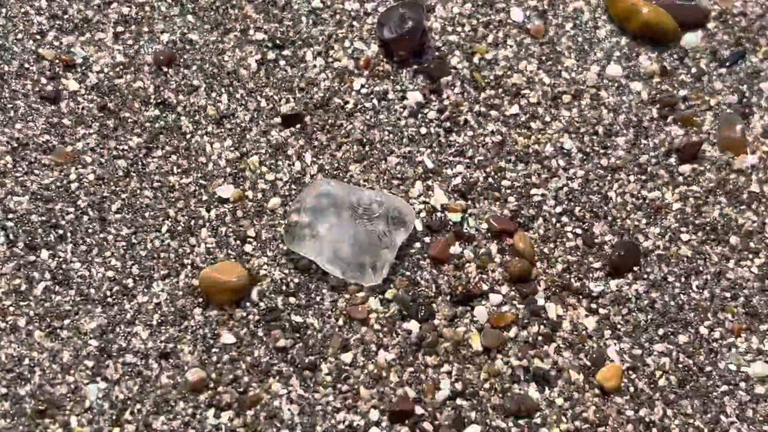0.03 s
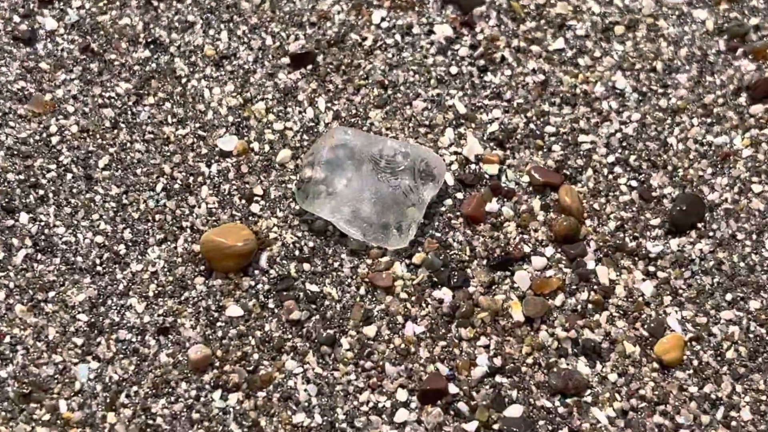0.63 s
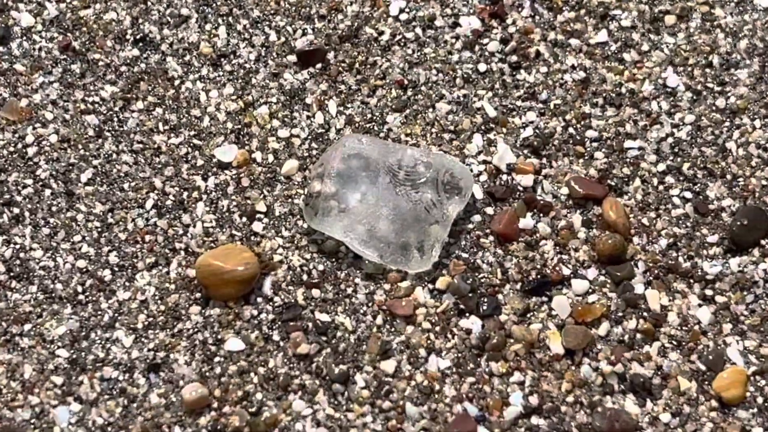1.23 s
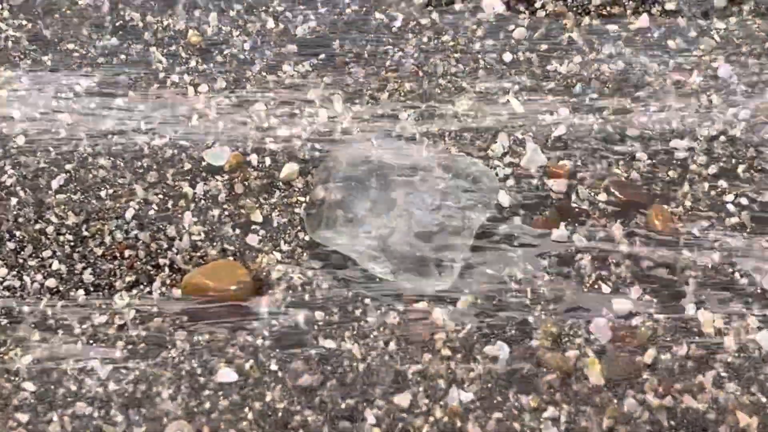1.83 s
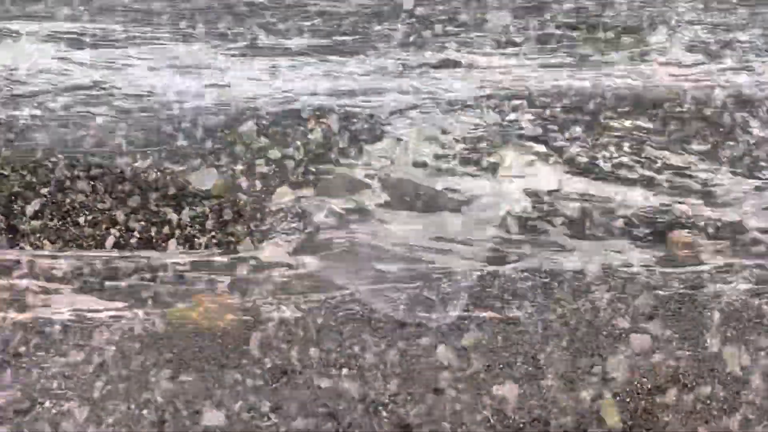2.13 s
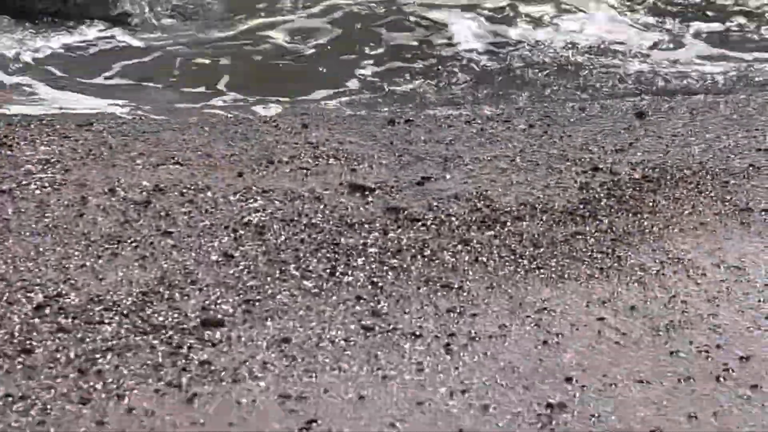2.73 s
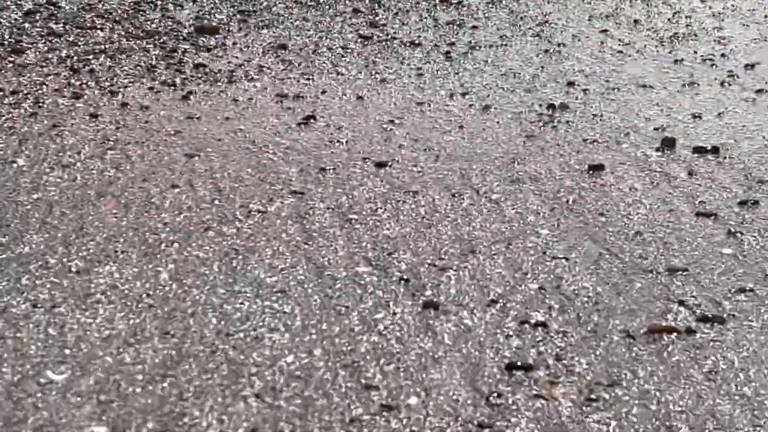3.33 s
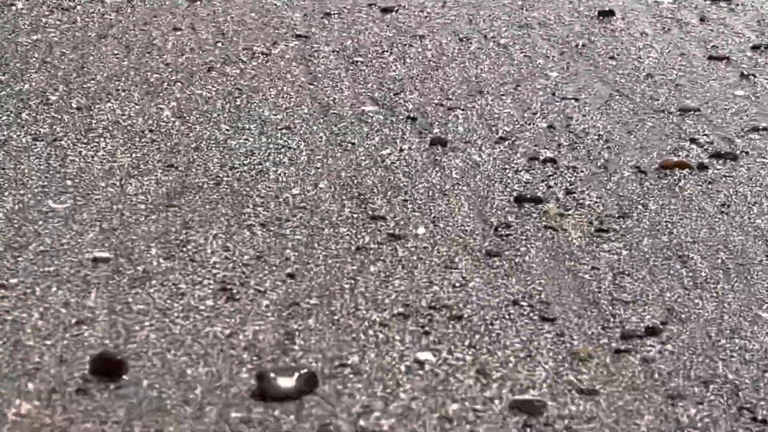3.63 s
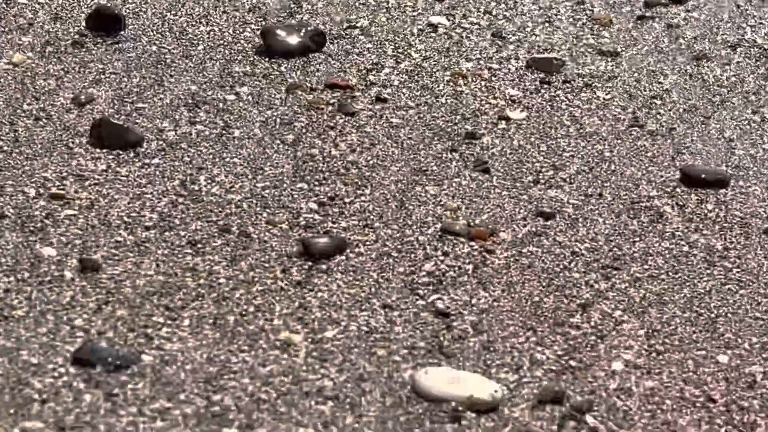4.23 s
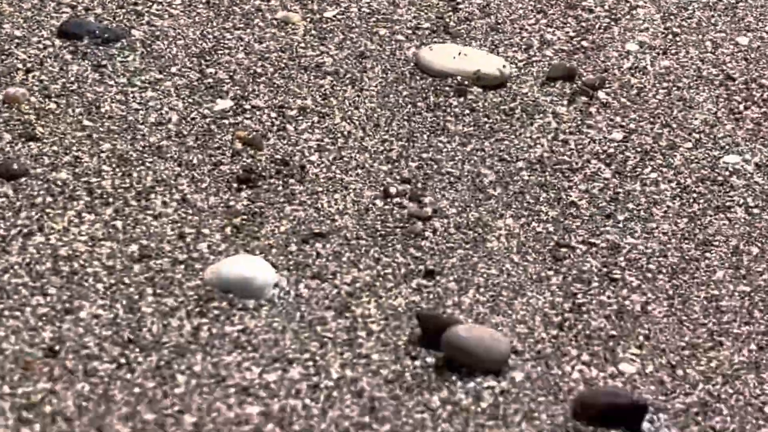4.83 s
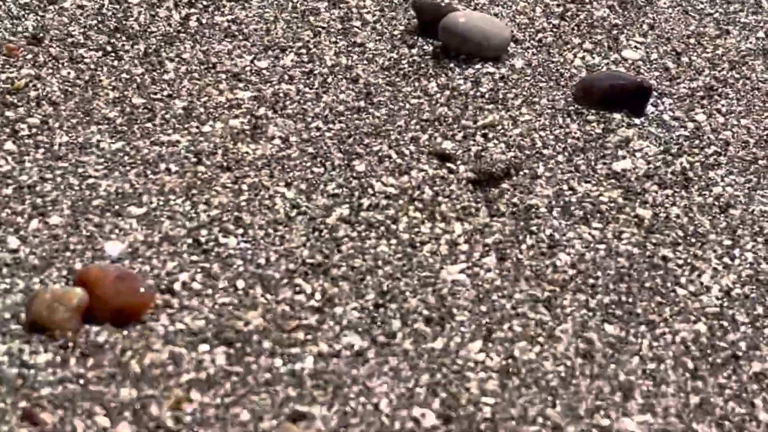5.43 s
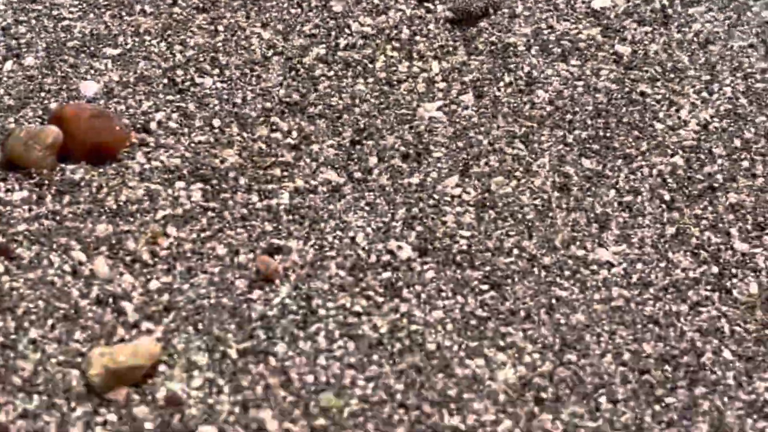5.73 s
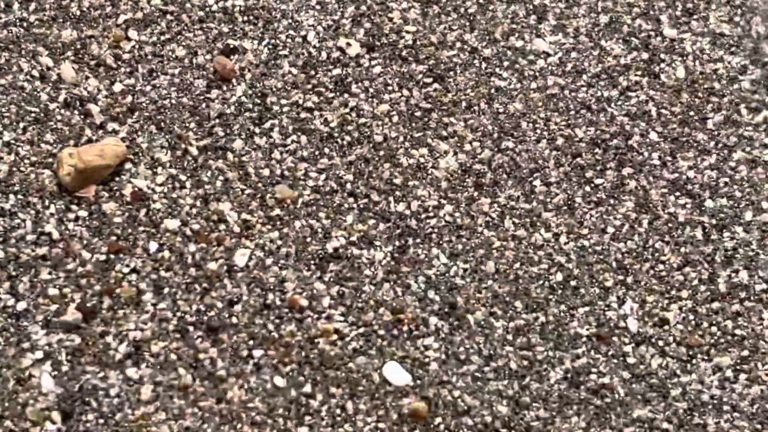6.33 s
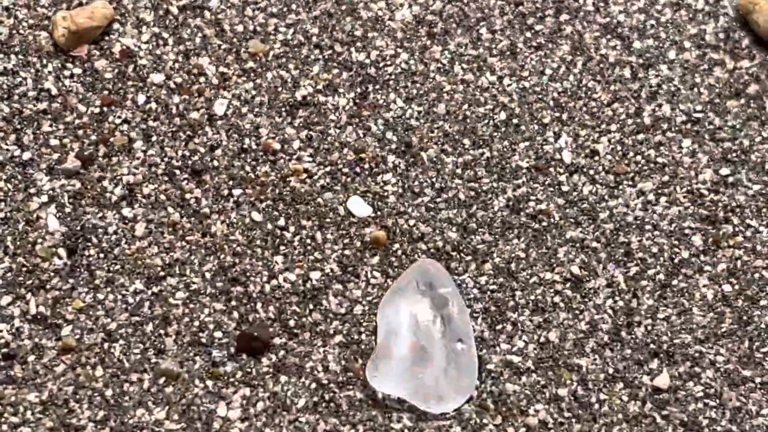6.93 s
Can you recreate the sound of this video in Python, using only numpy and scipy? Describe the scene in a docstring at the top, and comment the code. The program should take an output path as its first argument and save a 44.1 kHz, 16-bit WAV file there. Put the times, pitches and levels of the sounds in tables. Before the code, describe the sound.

Gentle surf washes up a gritty shore three times over a dull sea roar, while soft wind buffets bump the microphone.

```python
"""A beach of fine shingle, heard from just above the water line.
Bubble clouds roar dully in the surf further out. Three small waves spill and wash up, with weaker
ones between; their bubbles ring, their foam fizzes and they rattle the grit, each with a ground echo.
Light wind rumbles on the microphone, with a cluster of soft buffets before the middle wave."""
import sys
import numpy as np
from scipy import signal
from scipy.fft import rfft, irfft, next_fast_len
from scipy.io import wavfile
from scipy.ndimage import uniform_filter1d, map_coordinates

SR = 44100
rng = np.random.default_rng(int(sys.argv[2]) if len(sys.argv) > 2 else 0)


def master_out(mix):
    """Clip the mix to full scale and print it as 16-bit PCM to the path in sys.argv[1]."""
    frames = np.transpose(np.atleast_2d(mix))
    ceiling = np.clip(frames, -1, 1)
    pcm = np.round(ceiling * 32767).astype(np.int16)
    wavfile.write(sys.argv[1], SR, pcm)


N = 317520

# Breaking waves: (break time [s], build-up [s], spill length [s],
# roar level [dB], wash level [dB], foam level [dB], foam build-up [s])
WAVES = [(-0.13, .31, 0.17, -31.5, -31.5, -44.5, .31), (2.454, 0.91, 0.25, -36.5, -39, -43.5, 0.89),
         (3.24, 0.31, 0.54, -31.5, -29, -37, 0.083), (4.383, 0.46, 0.31, -35.5, -36, -66, .8),
         (5.332, 0.49, 0.18, -35, -63, -82, .43), (6.598, 0.72, 0.55, -29.5, -29.5, -42, 0.61)]


def amp(db):
    """Amplitude ratio: tenfold for every 20 dB."""
    return 10 ** (np.asarray(db) / 20)


def unit(x):
    """Normalisation to an rms of 1."""
    return x / np.sqrt(np.mean(x ** 2) + 1e-20)


def along(points, hz, column=1):
    """Interpolation of one table column on a logarithmic frequency axis."""
    columns = np.transpose(points)
    return np.interp(np.log(hz + 1), np.log(columns[0] + 1), columns[column])


def wobble(rate_hz):
    """Slow random modulation: a spline through rate_hz Gaussian knots a second."""
    knots = rng.standard_normal(1024)
    return map_coordinates(knots, [np.arange(N) * rate_hz / SR], mode="wrap")


def filtered(x, response):
    """Linear filtering: the spectrum of x times a complex frequency response."""
    padded = next_fast_len(N + 8192)
    return irfft(rfft(x, padded) * response(np.fft.rfftfreq(padded, 1 / SR)), padded)[..., :N]


def surges(rows, lag_s, ebb_s, calm_db):
    """Incoherent addition: surges build, hold and ebb, and their powers add over a calm floor."""
    t = np.arange(N) / SR - lag_s
    power = amp(calm_db) ** 2
    for start, build, length, db in rows:
        shape = np.exp(np.minimum(t - start, 0) / build - np.maximum(t - start - length, 0) / ebb_s)
        power = power + (amp(db) * shape) ** 2
    return np.sqrt(power)


def churn(patchy_db):
    """Modulated noise: two white streams whose strength varies in patches of time and frequency."""
    spectra = signal.stft(rng.standard_normal((2, N)), nperseg=512)[2]
    patches = uniform_filter1d(rng.standard_normal(spectra.shape[1:]), size=5, axis=0)
    patches = uniform_filter1d(patches, size=12, axis=1)
    return unit(signal.istft(spectra * amp(patchy_db * unit(patches)), nperseg=512)[1][:, :N])


def grains(low_hz, high_hz, cycles, spread_db, rise, count, samples):
    """Damped oscillators in two streams: bubbles that glide upward, or stones that tick."""
    when, pitch, bulk, life, side = rng.random((count, 5)).T[:, :, None]
    hz = low_hz * (high_hz / low_hz) ** pitch
    t = np.arange(samples) / SR
    age = t * hz / (cycles * (.5 + life))  # in decay times
    strength = amp(spread_db * np.minimum(-np.log(1 - bulk), 5)) * hz / high_hz
    envelope = strength * np.exp(-age) * (1 - t / t.max())
    ring = envelope * np.sin(2 * np.pi * hz * t * (1 + rise * np.minimum(age, 2)))
    where = (when * N).astype(int) + np.arange(samples)
    pan = (np.cos(2 * np.pi * side), np.sin(2 * np.pi * side))
    return unit(np.array([np.bincount(where.ravel(), (ring * p).ravel(), N)[:N] for p in pan]))


def over_ground(pair):
    """Comb filtering: an inverted echo off the porous shingle, its delay set by microphone height."""
    # Ground reflection, strong while the microphone is low: (time [s], delay [ms], strength [0-1])
    reflection = [(0, 1.19, .22), (1.2, 1.22, .17), (2.0, 1.9, .04), (5.3, 1.03, .06), (5.6, 1.04, .18),
                  (6.0, 1.07, .2), (6.4, 1.15, .34), (7.2, 1.33, .1)]
    times, delays, strengths = np.transpose(reflection)
    t = np.arange(N) / SR
    delay_ms, strength = np.interp(t, times, delays), np.interp(t, times, strengths)
    delayed = np.arange(N) - delay_ms * SR / 1000
    glancing = filtered(pair, lambda hz: 1 / (1 + (hz / 7500) ** 4))  # the rough bed scatters treble
    echo = np.array([map_coordinates(stream, [delayed]) for stream in glancing])
    return (pair - strength * echo) / np.hypot(1, strength)


def in_stereo(pair, colour):
    """Partial coherence: two independent streams are coloured and mixed to left and right, at rms 1."""
    # Stereo image across frequency: (frequency [Hz], coherence [0-1], left lead [rad], left over right [dB])
    stereo_image = [(60, .97, 0, 0), (140, .72, .1, 0), (320, .84, .1, .2), (500, .75, 0, .6),
                    (800, .5, 0, 1.8), (1130, .38, -.4, 1.5), (1350, .56, -2.4, -3.1),
                    (1590, .58, -2.5, -4.3), (1640, .7, -3.2, -4.5), (1672, .75, -5.0, -5),
                    (1750, .82, -5.9, -4.6), (2200, .95, -6.2, -1.6), (3200, .975, -6.25, -.3),
                    (3700, .997, -6.28, 0), (5100, .997, -6.3, 0), (5500, .8, -7.1, 0),
                    (7400, .75, -8.15, 0), (8300, .95, -9.4, 0), (9200, .6, -10.4, 0),
                    (10300, .63, -11.1, 0), (11300, .9, -12.2, 0), (12000, .99, -12.55, 0),
                    (12800, .9, -12.9, 0), (13500, .6, -13.9, 0), (14500, .55, -14.4, 0)]

    def blend(hz):
        turn = np.arccos(np.clip(along(stereo_image, hz), 0, 1)) / 2
        return amp(along(colour, hz)) * [np.cos(turn), np.sin(turn)]

    def lean(hz):
        lead, balance_db = along(stereo_image, hz, column=2), along(stereo_image, hz, column=3)
        half = np.exp(.5j * lead) * amp(balance_db / 2)
        sides = np.array([half, 1 / half])
        return sides / np.linalg.norm(sides, axis=0)
    common, apart = filtered(pair, blend)
    return unit(filtered(np.array([common + apart, common - apart]), lean))


def swells(rows):
    """Band-limited noise: each row swells and fades in a Gaussian envelope, with its ground echo."""
    t = np.arange(N) / SR
    total = np.zeros((2, N))
    for peak_s, db, half_s, centre_hz, octaves in rows:
        passband = lambda hz: np.exp(-(np.log2((hz + 1) / centre_hz) / octaves) ** 2 / 2)
        band = filtered(rng.standard_normal((2, N)), passband)
        total += amp(db) * np.exp(-((t - peak_s) / half_s) ** 2) * unit(band)
    return np.std(total) * in_stereo(over_ground(total), colour=[(1, 0), (SR, 0)])


def wind():
    """Turbulent pressure: eddies rumble on the microphone in quick lumps, harder in each gust."""
    # Gusts: (time [s], build-up [s], length [s], level [dB])
    gusts = [(0.03, 0.079, 0.053, -42.5), (2.0, 0.2, 1, -35), (3.42, 0.21, 0.059, -31.5),
             (4.35, 0.34, 0.15, -36), (4.88, 0.1, 0.042, -41), (5.6, 0.46, 0.58, -47),
             (6.62, 0.71, 0.71, -36.5)]
    # Spectrum of the eddies: (frequency [Hz], relative level [dB])
    colour = [(15, -40), (28, -22), (42, -6.5), (60, -0.5), (80, 0), (130, -2.5), (200, -14.5), (300, -40),
              (700, -56), (2000, -70)]
    lumps = unit(amp(1.3 * wobble(22)))
    gain = surges(gusts, lag_s=0, ebb_s=0.33, calm_db=-50.5) * lumps
    return gain * in_stereo(rng.standard_normal((2, N)), colour)


def buffets():
    """Pressure pulses: single eddies shove the diaphragm into low swings under a puff of turbulence."""
    # Eddies striking the microphone: (time [s], peak level [dB], frequency [Hz], swell time [s])
    eddies = [(2.022, -20, 89.5, 0.008), (2.051, -22, 74.4, 0.013), (2.053, -25.5, 212, 0.0048),
              (2.099, -30, 80, 0.014), (2.184, -41, 90, 0.02), (2.29, -25, 129, 0.0057),
              (2.391, -25, 101, .009), (2.448, -13, 147, 0.0033), (2.463, -17, 76, 0.012),
              (2.637, -16.5, 141, 0.0014), (2.64, -17, 70, 0.0093), (2.68, -21, 90, 0.012),
              (2.759, -30, 110, 0.01), (2.826, -26, 133, 0.0096), (2.861, -22, 90, 0.013),
              (2.887, -14, 122, 0.018), (2.912, -19, 153, 0.013), (3.026, -25, 94, 0.0073),
              (3.44, -22, 128, 0.0056), (3.59, -25, 59.6, 0.018), (4.025, -26, 53.7, 0.0092),
              (6.624, -27, 75, .009), (6.685, -28, 60, .014), (6.723, -18, 89, 0.0069),
              (7.041, -31, 70, 0.016)]
    # Noise spectra: (frequency [Hz], relative level [dB])
    puff_colour = [(25, -27), (60, 15), (150, 10), (240, 12), (400, -24), (1200, -59), (4000, -92)]
    rush_colour = [(100, -23), (280, 6), (480, -8), (900, -19), (2000, -45), (6000, -80)]
    swings, puffs = np.zeros(N), np.zeros(N)
    for start, db, hz, swell in eddies:
        t = np.maximum(np.arange(N) / SR - start, 0)
        push = amp(db) * t / swell * np.exp((1 - (t / swell) ** 2) / 2)
        swings -= push * np.sin(2 * np.pi * hz * t)
        puffs += push
    leak = signal.butter(3, 32, "high", fs=SR, output="sos")  # the slowest pressure leaks away
    turbulence = amp(-10.5) * puffs * in_stereo(rng.standard_normal((2, N)), puff_colour)
    # By the square law, only the hardest eddies rush in the midrange.
    rush = amp(-7) * puffs ** 2 * in_stereo(rng.standard_normal((2, N)), rush_colour)
    return signal.sosfilt(leak, swings) + turbulence + rush


def roar():
    """Low bubble resonance: clouds of large bubbles boom and gurgle in the surf further out."""
    # Spectrum of the surf: (frequency [Hz], relative level [dB])
    colour = [(30, -34), (80, -6.5), (130, -3.5), (200, 0), (280, -1), (360, -1), (500, -1), (650, -3),
              (850, -7.5), (1100, -8), (1500, -12.5), (2000, -14.5), (4000, -66), (14000, -38.5)]
    rows = [(start, build, spill, db) for start, build, spill, db, _, _, _ in WAVES]
    gain = surges(rows, lag_s=0.0029, ebb_s=0.61, calm_db=-37) * amp(0.36 * wobble(7.5))
    glugs = grains(322.8, 640, cycles=7.2, spread_db=1.0, rise=0.011, count=500, samples=2600)
    return gain * in_stereo(churn(patchy_db=0.84) + amp(-23) * glugs, colour)


def grit():
    """Friction noise: grit crunches close by, and the waves drag a hissing bed of it over the beach."""
    # Shifting grit: (time [s], level [dB], half-length [s], centre [Hz], width [octaves])
    shifts = [(.75, -61, 0.59, 11100, 0.26), (1.08, -58, .012, 11500, .3), (2.703, -44, .0015, 12000, .25),
              (2.802, -46, 0.014, 5800, 0.6), (2.803, -48, .009, 11400, .25),
              (1.514, -49.5, .007, 4800, .04), (2.35, -51, 0.27, 4300, .45), (3.07, -41.5, .04, 2600, 0.35),
              (3.18, -43.5, 0.035, 4200, 0.58), (3.335, -52, .022, 11700, 0.33),
              (3.62, -51, .15, 11400, .3), (3.62, -37, 0.33, 3500, 0.69), (3.92, -33.5, 0.58, 2170, 0.53),
              (4.9, -44.5, 0.47, 2910, 0.63), (6.37, -45, 0.23, 4260, 0.53), (6.9, -44, 0.69, 4400, 0.19),
              (6.675, -39, 0.028, 3700, .45), (6.69, -50, 0.065, 10500, .45)]
    return swells(shifts)


def foam():
    """Damped ringing: bubbles ping in the bursting foam, and fine shingle ticks as the water rolls it."""
    # Spectrum of the foam: (frequency [Hz], relative level [dB])
    colour = [(800, -7.5), (2000, -4), (2800, 2), (3600, -0.5), (4800, -2), (6000, -4.5), (8000, -17.5),
              (10500, -10.5), (13500, -16), (15500, -23)]
    rows = [(start, build, spill, db) for start, _, spill, _, _, db, build in WAVES]
    gain = surges(rows, lag_s=0.08, ebb_s=0.65, calm_db=-52) * amp(0.24 * wobble(11))
    fizz = grains(2800, 5600, cycles=70, spread_db=1.2, rise=0.0032, count=2200, samples=1600)
    ticks = grains(5200, 11800, cycles=2.3, spread_db=2.0, rise=0, count=7000, samples=100)
    sizzle = over_ground(churn(patchy_db=1.8) + amp(-14) * fizz + amp(-8.5) * ticks)
    return gain * in_stereo(sizzle, colour)


def splashes():
    """Impact noise: water slaps and plunges where a crest falls over."""
    # Falling water: (time [s], level [dB], half-length [s], centre [Hz], width [octaves])
    plunges = [(.11, -36, 0.092, 1000, .6), (.173, -31, 0.03, 700, 1.23), (.175, -33.5, .025, 447, .35),
               (.3, -44, 0.62, 336, 0.58), (2.92, -38, 0.23, 805, 0.67), (4.075, -32, 0.036, 1730, 0.07),
               (3.63, -31, .03, 220, .6), (5.6, -41.5, 0.55, 211, 0.36), (6.5, -38, 0.76, 166, 0.21),
               (6.37, -39.5, .17, 1500, 0.91), (6.71, -33, 0.067, 1100, 1.05), (6.85, -28, 0.031, 400, 1.2),
               (7.08, -37.5, 0.12, 330, 0.44)]
    return swells(plunges)


def wash():
    """Bubble resonance: the spilling crest is an even rush of water, dense with small ringing bubbles."""
    # Spectrum of the spilling crest: (frequency [Hz], relative level [dB])
    colour = [(150, -45), (400, -4.5), (700, -0.5), (950, 0.5), (1200, 0.5), (1500, 5.5), (1760, 4),
              (1900, -4), (2200, -2), (2800, -7), (3600, -11.5), (6000, -18), (10000, -23), (15000, -30)]
    rows = [(start, build, spill, db) for start, build, spill, _, db, _, _ in WAVES]
    gain = surges(rows, lag_s=0.14, ebb_s=0.93, calm_db=-48) * amp(0.18 * wobble(18))
    bubbles = grains(683, 3630, cycles=4.8, spread_db=1.0, rise=0.03, count=9000, samples=400)
    water = over_ground(churn(patchy_db=2.0) + amp(-13.5) * bubbles)
    return gain * in_stereo(water, colour)


def scene():
    """Superposition: the pressures of sea, shore and wind add."""
    return roar() + wash() + splashes() + foam() + grit() + wind() + buffets()


def record(dry):
    """Spectral shaping: narrow peaks and dips colour the whole sound, under a band limit."""
    # Narrow peaks and dips: (frequency [Hz], width [Hz], gain [dB])
    hollow_colour = [(281, 34, -1.5), (363, 58, 0.74), (528, 28, -1.4), (1290, 38, -1.2), (1643, 18, -6),
                     (1740, 57, 0.9), (1910, 53, 2.4)]
    top_hz = 14600

    def response(hz):
        gain_db = sum(db * np.exp(-((hz - centre) / width) ** 2) for centre, width, db in hollow_colour)
        return amp(gain_db) * (hz < top_hz)
    return filtered(dry, response)


dry = scene()
out = record(dry)
master_out(out)
```